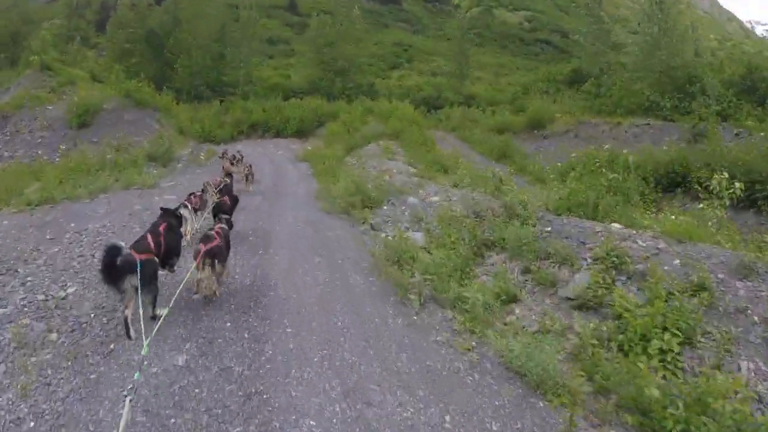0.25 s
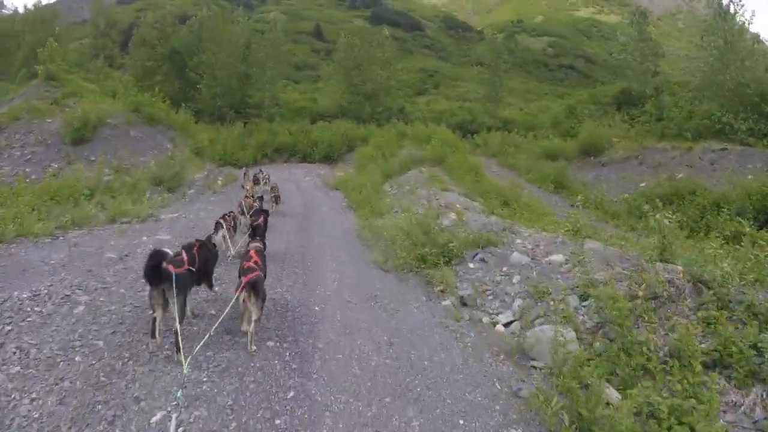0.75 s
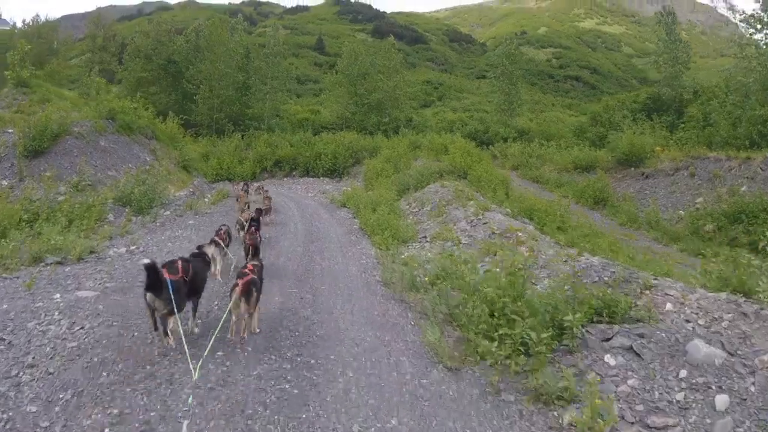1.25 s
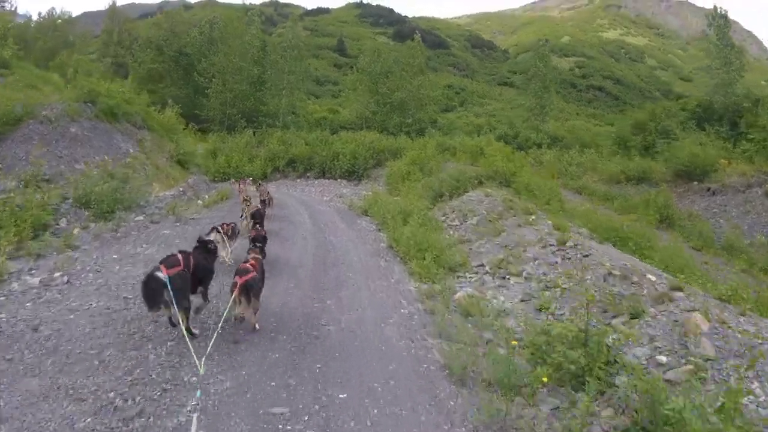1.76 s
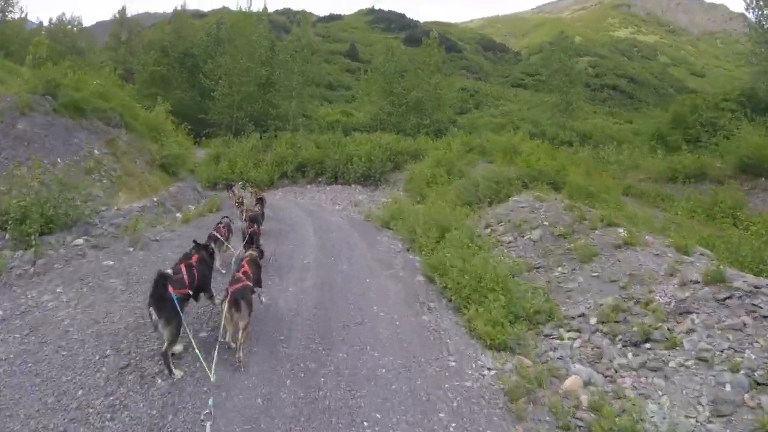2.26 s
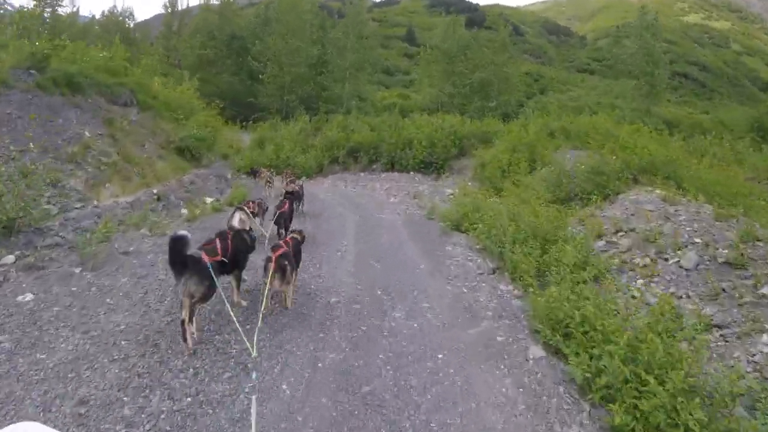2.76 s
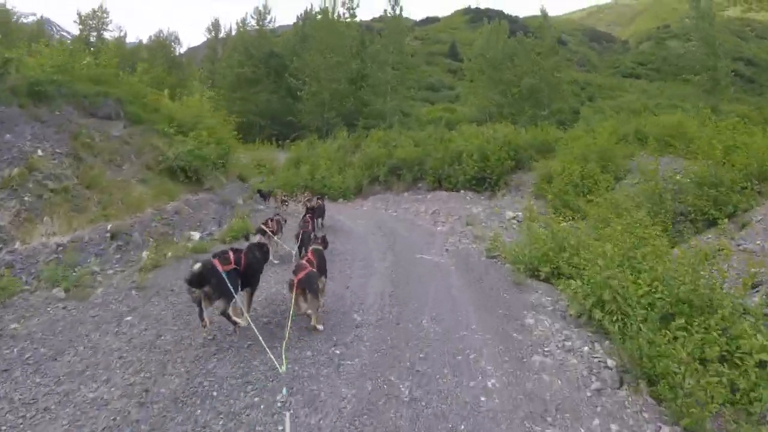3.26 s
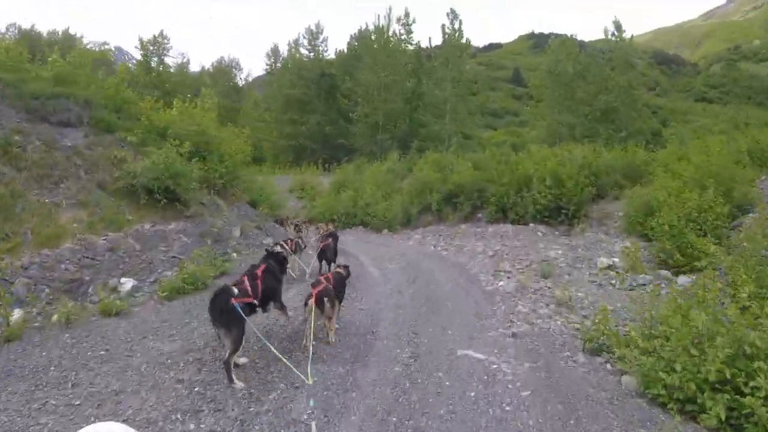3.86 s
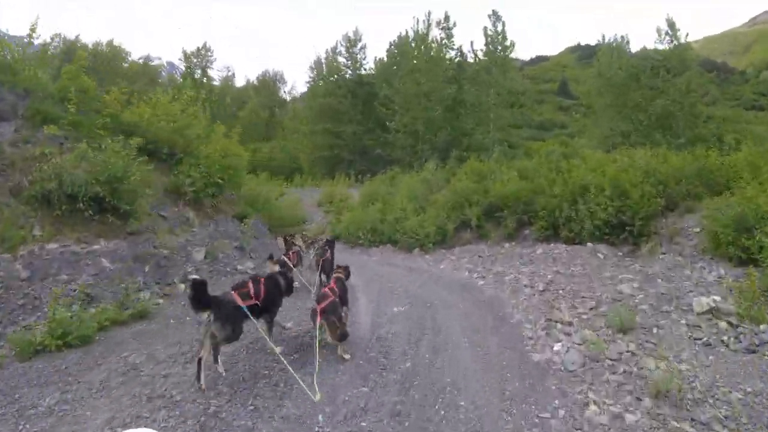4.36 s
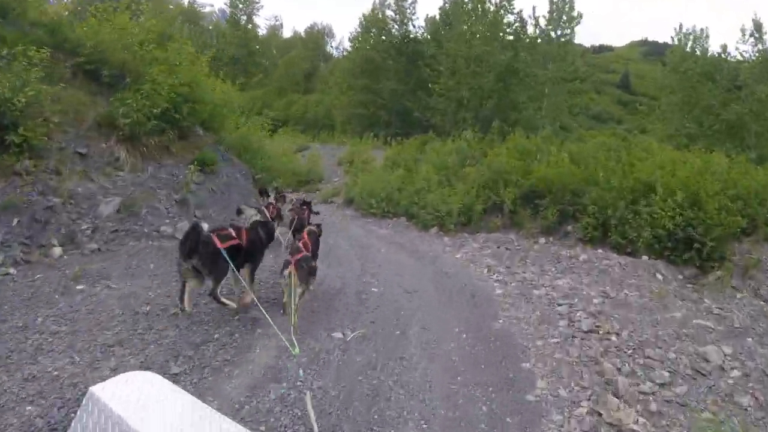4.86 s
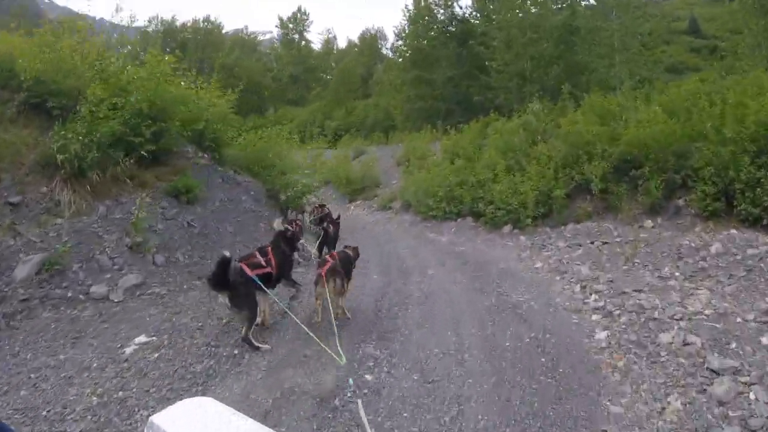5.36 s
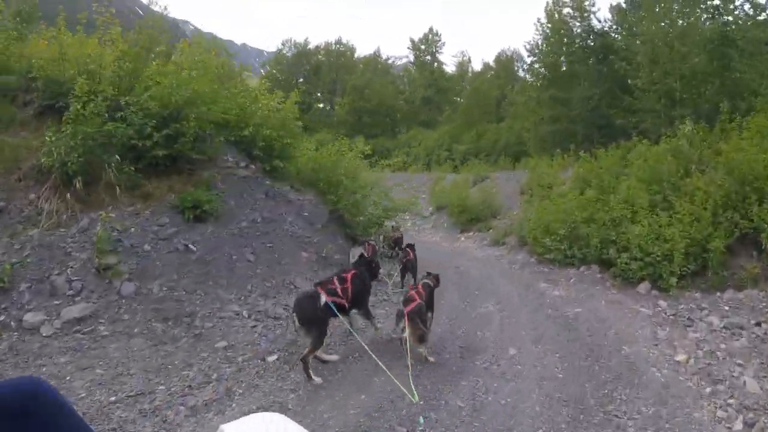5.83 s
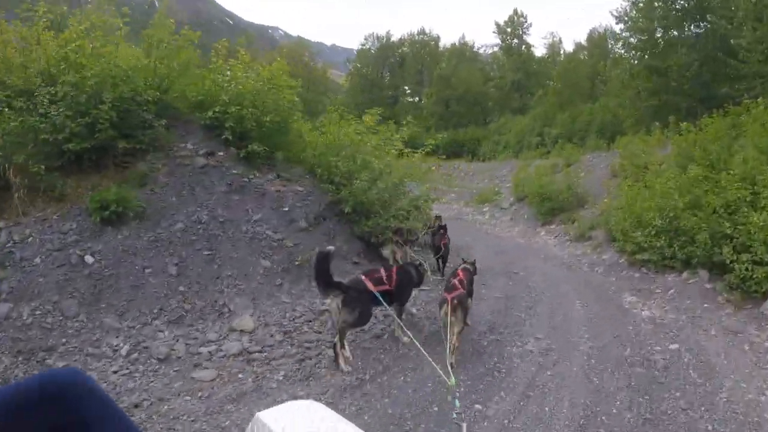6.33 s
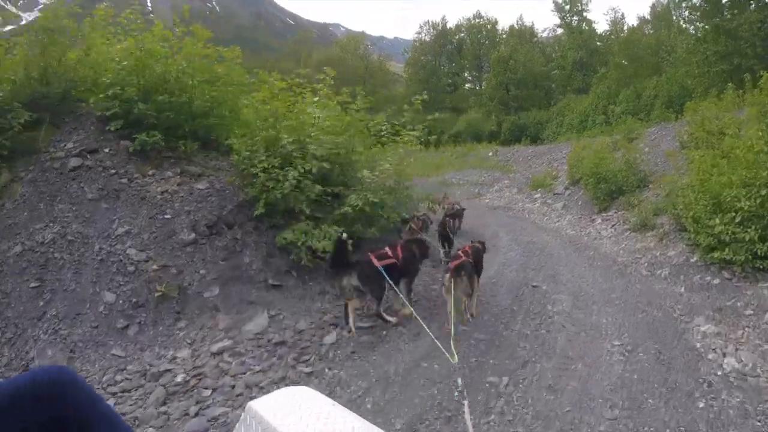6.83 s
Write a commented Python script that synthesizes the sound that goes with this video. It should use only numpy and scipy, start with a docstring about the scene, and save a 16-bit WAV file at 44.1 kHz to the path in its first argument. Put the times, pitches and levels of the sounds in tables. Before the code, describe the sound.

A wheeled cart rolls steadily over loose gravel, deep uneven rumble underneath, stones crunching and thudding under the tyres, one sharp metallic clack near the end.

```python
"""On a gravel track, a cart pulled by a dog team rolls along, heard by a small microphone on board.
Bumps drive resonances of the frame into a low rumble; slipping stones crunch as noise bursts under
the tyres, and larger ones thud. Lumps ring the tyre air, grit ticks and taps the metal floor pan,
a thrown stone clacks on the pan modes and a harness snap clinks; the recorder's limiter evens out
the rumble and its input rounds the peaks."""
import sys
import numpy as np
from scipy import signal
from scipy.fft import rfft, irfft
from scipy.io import wavfile
from scipy.ndimage import uniform_filter1d

SR = 44100
rng = np.random.default_rng(int(sys.argv[2]) if len(sys.argv) > 2 else 0)


def dump(signal):
    """Clip the signal to [-1, 1] and save it as 16-bit WAV at the path in sys.argv[1]."""
    limited = np.clip(np.atleast_2d(signal).T, -1, 1)
    pcm = np.round(limited * 32767).astype(np.int16)
    wavfile.write(sys.argv[1], SR, pcm)


N = 312669

# large stones giving way under the tyres: [t/s, burst level/dB, thud over burst/dB]
STONE_BLOWS = [(0.019, -34, 10), (0.174, -34.5, 8), (0.2019, -33.5, 7), (0.2747, -38, 9.5),
               (0.3131, -36.5, 4), (0.388, -48, 6), (0.4497, -37, 4), (0.541, -39, -6), (0.633, -34.5, 9),
               (0.773, -39, 9.5), (0.8388, -36, 10.5), (0.884, -33, 8), (1.1262, -35.5, 6.5),
               (1.518, -30.5, 4), (1.5735, -30.5, 6.5), (1.653, -31.5, 9), (1.7023, -30, -2),
               (1.726, -30.5, 10), (1.9583, -34, 6.5), (2.3083, -38, -3), (2.368, -29.5, 6.5),
               (2.422, -28.5, 9.5), (2.438, -35, 7), (2.4559, -36.5, 9), (2.482, -33.5, 3.5),
               (2.4977, -46, 1), (2.72, -34.5, 4), (2.9015, -36, -4), (3.028, -44, 16.5), (3.147, -39, 7),
               (3.3944, -37, 4), (3.4863, -36.5, 11), (3.6657, -39, -6), (3.8213, -29, 3),
               (3.8937, -33, 6.5), (3.94, -35, 7.5), (4.142, -33, 6), (4.2191, -31, 7.5), (4.375, -41, -13),
               (4.5262, -38, -16), (4.706, -51, 15), (4.873, -30.5, 2), (4.915, -34, -29), (4.948, -34, 14),
               (5.005, -31.5, 6), (5.275, -38, 6), (5.3728, -34, 1), (5.4025, -32, 1), (5.6369, -27.5, 5),
               (6.176, -36.5, -15), (6.327, -32, 1.5), (6.4823, -26, 6), (6.5, -45, 13.5), (6.542, -38, 3),
               (6.783, -46, 14), (6.97, -34, 8.5)]
# modes of the metal floor pan: [f/Hz, relative level/dB, time to fall 60 dB t/s]
PAN_MODES = [(2170, -7, 0.14), (2490, -12, .12), (2890, -2.5, 0.15), (3400, -10, 0.11), (4000, -17, 0.13),
             (4400, -12.5, .1), (4570, -16, .13), (4690, 1, 0.058), (4900, -6, 0.14), (5330, -16, .1),
             (5600, -3, 0.072), (6240, 2, 0.067), (7100, -6, .06), (10300, -15, .045)]


def frame():
    """Forced resonance: random bumps drive the low modes of frame and tyres; a limiter evens them out."""
    # resonances: [f/Hz, width of the narrower filter/Hz, relative level/dB]
    resonances = [(38, 20, -9), (68.3, 29, -8.5), (101.2, 30, -1.5), (127.8, 33, 0.5), (157.6, 34, -2.5),
                  (200.6, 31, -8.5), (244.6, 20.4, -13.5)]
    # gain of the resonances below 80 Hz: [t/s, level/dB]
    deep_gain = [(0, -5), (.8, -0.5), (1.6, 0), (2.5, 1), (3.1, -3.5), (3.7, -4.5), (4.3, 0), (4.8, 5),
                 (5.3, -1), (6.2, 3.5), (7.09, 4)]
    deep_db = np.interp(np.arange(N) / SR, *np.transpose(deep_gain))
    rumble = 0
    for hz, width, db in resonances:
        bumps = rng.standard_normal(N)
        mode = unit(band(band(bumps, hz, width), hz, 2 * width))
        # each resonance swells on its own
        mode_db = db + (hz < 80) * deep_db + 1.6 * walk(rate=18)
        rumble = rumble + undb(mode_db) * mode
    rumble = unit(rumble)
    # the recorder's limiter evens out the rumble: loud swells are turned down, weak ones lifted
    limiter_share, limiter_s = 0.42, 0.045
    k = int(limiter_s * SR)
    swell_power = uniform_filter1d(uniform_filter1d(rumble ** 2, k), k) + 0.053
    return unit(rumble / swell_power ** (limiter_share / 2))


def jolts():
    """Impulsive excitation: each large knock lifts the rumble gain, which decays exponentially."""
    gain_over_knock_db, t60_s = 30.5, 0.27
    s, db, _ = np.transpose(STONE_BLOWS)
    decay = undb(-60 / (t60_s * SR))
    shake = signal.lfilter([1], [1, -decay], spikes(s, db + gain_over_knock_db))
    return np.sqrt(1 + uniform_filter1d(shake, 300) ** 2)


def gravel(coarse_db, grit_db):
    """Granular noise: coarse slips crunch over a roll that rings the tyre air; fine grit crackles."""
    # colour of crushed coarse stones: [f/Hz, relative level/dB]
    coarse_colour = [(160, -27), (280, -1.5), (323, -4), (481, -6), (543, -3), (595, -6.5), (1140, -12.5),
                     (1860, -22.5), (2330, -23.5), (3200, -36), (4160, -60), (7040, -120)]
    # colour of crushed fine grit: [f/Hz, relative level/dB]
    grit_colour = [(1650, -34.5), (2800, -1.5), (4080, -4.5), (6300, -1.5), (6950, -8), (10600, -7.5),
                   (11900, -38), (13500, -18.5), (14900, -35)]
    tyre_hz, tyre_width_hz, tyre_db = 552, 108, -14
    surge = walk(rate=21.94)

    stones = crunch(per_s=320, spread_db=3.5, tail_s=0.013, bed=0.49)
    roll = rng.standard_normal(N)
    # slips are heard in the upper part; the tyre smooths the lower part
    edge = signal.lfilter(*signal.butter(2, 450, "high", fs=SR), stones - roll)
    tyre_air = undb(tyre_db) * unit(band(roll, tyre_hz, tyre_width_hz))
    coarse = colour(roll + edge, coarse_colour) + tyre_air

    # grains of three sizes crackle on their own; the large slips throw all of them
    grit = 0
    for hz, width in [(3300, 1600), (5800, 6200), (10000, 6600)]:
        grains = crunch(per_s=410, spread_db=3.0, tail_s=0.0012, bed=0.51) + 0.2 * stones
        grit = grit + undb(1.6 * walk(rate=35)) * band(grains, hz, width)
    grit = grit * spills(per_s=37, tail_s=0.01, depth=6.9)
    grit = unit(colour(grit, grit_colour))

    # even hiss of the gravel further off
    far = undb(-55) * unit(band(rng.standard_normal(N), 5000, 5800))
    return undb(coarse_db + 1.8 * surge) * coarse + undb(grit_db + 0.5 * surge) * grit + far


def crunch(per_s, spread_db, tail_s, bed):
    """Shot noise: few large and many small stones slip at random, each a short burst over a bed."""
    when, size = rng.random((int(per_s * N / SR), 2)).T
    # spikes are powers here; their levels spread exponentially up to 4.5 spreads
    slips = spikes(when * (N - 1) / SR, -2 * spread_db * np.log(1 - size).clip(-4.5, 0))
    power = signal.lfilter([1], [1, -np.exp(-1 / (tail_s * SR))], slips)
    return unit(np.sqrt(power / power.mean() + bed) * rng.standard_normal(N))


def spills(per_s, tail_s, depth):
    """Relaxation: the gain jumps whenever a handful of grit breaks loose, then settles."""
    when, size = rng.random((int(per_s * N / SR), 2)).T
    breaks = spikes(when * (N - 1) / SR, -12 * size)
    jumps = signal.lfilter([1], [1, -np.exp(-1 / (tail_s * SR))], breaks)
    return np.sqrt(1 + depth * uniform_filter1d(jumps, 40))


def knocks():
    """Impact and friction: a stone gives way in a grinding burst and thuds on the body resonances."""
    # sharp part of a burst: [f/Hz, relative level/dB]
    burst_colour = [(1200, -7.5), (1800, -6), (2350, -4.5), (3000, -8.5), (4000, -10), (6300, -10.5),
                    (7200, -14.5), (10500, -26.5), (14900, -46)]
    # cart body under a blow: [f/Hz, width of the narrower filter/Hz, relative level/dB]
    body = [(523, 130, 0), (869, 205, 2), (1123, 95, -1.5), (1594, 150, -8), (2008, 170, -9.5),
            (2340, 220, -10.5)]
    hold_s, t60_s, rise_s = 0.0094, 0.22, 0.0025
    blow_db, blow_t60_s = 2.5, 0.019  # harder first contact
    pitch_share, spread_db = 0.06, 3  # every stone strikes the body elsewhere
    out, t = np.zeros(N + SR), np.arange(SR // 3) / SR
    grind = undb(-60 * np.maximum(t - hold_s, 0) / t60_s)
    fade = (grind + undb(blow_db - 60 * t / blow_t60_s)) * np.minimum(t / rise_s, 1)
    small = [(s, -39 + 1.5 * a, 1 + 5 * b) for s, a, b in strays(per_s=1)]
    for s, db, thud_db in small + STONE_BLOWS:
        noise = rng.standard_normal((3, len(t)))
        grain = undb(1.24 * unit(uniform_filter1d(noise[2], 90)))

        burst = colour(noise[0], burst_colour)
        low = signal.lfilter(*signal.butter(2, 3100, fs=SR), burst)
        # the heavier the thud, the darker the burst
        bright_db = -2.5 - 0.13 * thud_db
        burst = grain * (low + undb(bright_db) * (burst - low))

        thud = 0
        for hz, width, mode_db in body:
            a, b = rng.uniform(-1.24, 1, 2)
            struck_hz = hz * (1 + pitch_share * a)
            mode = unit(band(band(noise[1], struck_hz, width), struck_hz, 2 * width))
            thud = thud + undb(mode_db + spread_db * b) * mode
        thud = undb(thud_db) * grain * unit(thud)

        i = int(s * SR)
        out[i:i + len(t)] += undb(db) * fade * (burst + thud)
    return out[:N]


def thumps():
    """Damped oscillation: a lump and its scrape ring a dull tyre mode that sags in pitch."""
    # lumps under the tyres: [t/s, level/dB, starting f/Hz]
    lumps = [(.196, -15, 950), (0.388, -12.5, 565), (1.721, -15, 460), (1.819, -14.5, 500),
             (2.296, -21, 690), (2.371, -20, 518), (4.318, -20, 530), (4.481, -13.5, 600),
             (4.632, -33, 525), (4.779, -18, 620), (4.8755, -14, 1670), (4.883, -14, 576),
             (4.998, -12, 430), (5.588, -14, 574), (6.078, -18.5, 560), (6.472, -22, 660),
             (6.486, -21, 940), (6.903, -15, 620), (6.971, -14, 815)]
    sag_per_s, rise_s = 7.4, 0.0024  # the pitch sags as the tyre spreads
    cycles_to_60_db, scrape_db = 34, -4
    out, t = np.zeros(N + SR), np.arange(SR // 8) / SR
    small = [(s, -24 + 3 * a, 720 * (1 + 0.345 * b)) for s, a, b in strays(per_s=7)]
    for s, db, hz in small + lumps:
        scrape = unit(band(band(rng.standard_normal(len(t)), hz, 400), hz, 640))
        tone = np.sin(2 * np.pi * hz * t * (1 - sag_per_s * t / 2))
        fade = undb(db - 60 * t * hz / cycles_to_60_db) * np.minimum(t / rise_s, 1)
        i = int(s * SR)
        out[i:i + len(t)] += (tone + undb(scrape_db) * scrape) * fade
    return out[:N]


def ticks():
    """Transient narrow-band noise: a grain of grit snaps in a short click around its own pitch."""
    # single grains: [t/s, level/dB, f/Hz]
    grains = [(0.625, -26, 4910), (0.776, -30, 5000), (0.816, -39, 6200), (0.91, -37, 5940),
              (1.286, -32, 6500), (1.6, -35, 6380), (1.9714, -33, 6600), (2.622, -29, 6415),
              (2.768, -30, 3800), (3.265, -28, 5080), (3.613, -26, 6545), (4.062, -40, 8640),
              (4.1265, -30, 5360), (4.391, -25, 6130), (4.5286, -28, 4900), (4.668, -29, 6130),
              (5.005, -23, 6430), (5.149, -38, 7000), (5.258, -44, 6940), (5.274, -35, 5500),
              (5.2964, -26, 5900), (5.455, -22, 5700), (5.502, -29, 8000), (5.543, -35, 5500),
              (5.6096, -40, 6140), (5.6641, -19.5, 5200), (5.734, -26, 5600), (5.7695, -29, 5680),
              (5.861, -25, 5500), (5.902, -22, 4240), (6.0916, -24.5, 6100), (6.4294, -31, 5000),
              (6.457, -31, 5800), (6.579, -24, 5600), (6.666, -26, 6100), (6.847, -36, 8500)]
    t60_s, rise_s = 0.013, 0.00062
    out, t = np.zeros(N + SR), np.arange(SR // 50) / SR
    small = [(s, -34.5 + 3.5 * a, 5200 * (1 + 0.25 * b)) for s, a, b in strays(per_s=9)]
    for s, db, hz in small + grains:
        noise = rng.standard_normal(len(t))
        click = unit(band(band(noise, hz, 0.5 * hz), hz, 0.94 * hz))
        fade = undb(db - 60 * t / t60_s) * np.minimum(t / rise_s, 1)
        i = int(s * SR)
        out[i:i + len(t)] += click * fade
    return out[:N]


def clack():
    """Plate vibration: a thrown stone rings wavering pan modes over a hiss whose treble dies first."""
    # stone thrown against the floor pan: [t/s, level/dB]
    hits = [(6.326, -5.5)]
    # colour of the dense upper modes of the pan: [f/Hz, relative level/dB]
    dense_modes = [(530, -33), (900, -15), (1140, -10), (1310, -13), (2250, -7), (2910, -9), (3640, -5.5),
                   (5680, -4), (7710, -3), (10600, 4), (14900, -41)]
    out, t = np.zeros(N + SR), np.arange(SR // 3) / SR
    for s, db in hits:
        modes = 0
        for hz, mode_db, t60 in PAN_MODES:
            # the loose sheet makes each mode flutter
            flutter_db = 4.0 * unit(uniform_filter1d(rng.standard_normal(len(t)), 160))
            fade = undb(mode_db - 14.0 - 60 * t / t60 + flutter_db)
            modes = modes + fade * np.sin(2 * np.pi * hz * t)

        hiss = colour(rng.standard_normal(len(t)), dense_modes)
        low = signal.filtfilt(*signal.butter(3, 6900, fs=SR), hiss)
        # each part holds, falls and leaves a weaker tail
        slow = undb(-60 * np.maximum(t - 0.022, 0) / 0.08) + undb(-14 - 60 * t / 0.14)
        quick = undb(-60 * np.maximum(t - 0.006, 0) / 0.027) + undb(-25 - 60 * t / 0.16)
        wash = undb(-10.0) * (slow * low + quick * (hiss - low))
        crack = undb(-5 - 60 * t / 0.0074) * hiss
        i = int(s * SR)
        out[i:i + len(t)] += undb(db) * (modes + wash + crack)
    return out[:N]


def pings(grit_db):
    """Modal excitation: flying grit taps the floor pan, each tap ringing one of its modes faintly."""
    out = 0
    for hz, db, t60 in PAN_MODES:
        when, size = rng.random((60, 2)).T
        taps = spikes(when * (N - 1) / SR, -9 * size)
        # halved dB levels even out the modes
        out = out + undb(0.5 * db) * ring(taps, hz, 0.83 * t60)
    return undb(grit_db) * out


def clinks():
    """Free vibration: blows on the small steel harness snap ring its two high modes."""
    # blows: [t/s, level before filtering/dB]
    snap_blows = [(6.5525, -37), (6.5794, -38), (6.651, -47)]
    # modes of the snap: [f/Hz, gain/dB, time to fall 60 dB t/s]
    snap_modes = [(9750, 12, 0.022), (14300, -11, .025)]
    blows = band(spikes(*np.transpose(snap_blows)), 11000, 6000)
    return sum(undb(db) * ring(blows, hz, t60) for hz, db, t60 in snap_modes)


def undb(db):
    """Level law: amplitude ratio of a level in dB."""
    return 10 ** (np.asarray(db) / 20)


def unit(x):
    """Normalisation by energy: scale to rms 1."""
    return x / np.sqrt(np.mean(x ** 2))


def colour(x, table):
    """Minimum-phase filtering: a causal cepstral response to a (Hz, dB) outline, gain 1 on white noise."""
    hz, db = np.transpose(table)
    size = 2 ** 11
    grid_hz = np.arange(size + 1) * SR / 2 / size
    outline_db = np.interp(np.log(grid_hz + 1), np.log(hz), db)
    cepstrum = irfft(np.log(undb(outline_db)))
    # fold the negative times onto the positive ones
    cepstrum[1:size] *= 2
    cepstrum[size + 1:] = 0
    response = irfft(np.exp(rfft(cepstrum)))[:size]
    return signal.fftconvolve(x, response / np.linalg.norm(response))[:len(x)]


def ring(x, hz, t60):
    """Damped mode: a unit impulse rings as a decaying sine, its envelope starting at 1."""
    pole = np.exp(2j * np.pi * hz / SR - np.log(1000) / (t60 * SR))
    return signal.lfilter([1], [1, -pole], x).imag


def band(x, hz, width):
    """Second-order resonance with gain 1 at its centre."""
    return signal.lfilter(*signal.iirpeak(hz, hz / width, fs=SR), x)


def walk(rate):
    """Slow random modulation: levels held 1 / rate s and slewed twice, rms 1."""
    k = int(SR / rate)
    held = np.repeat(rng.standard_normal(N // k + 1), k)
    return unit(uniform_filter1d(uniform_filter1d(held, k), k)[:N])


def spikes(s, db):
    """Impulse train: one-sample blows at times s with levels db."""
    x = np.zeros(N)
    np.add.at(x, (np.asarray(s) * SR).astype(int), undb(db))
    return x


def strays(per_s):
    """Random point process: rows of a random time, then two draws between -1 and 1."""
    when, a, b = rng.random((int(per_s * N / SR), 3)).T
    return np.column_stack([when * (N - 1) / SR, 2 * a - 1, 2 * b - 1])


def humps(rows):
    """Smooth level modulation: sum of raised-cosine humps from (centre s, length s, dB) rows."""
    t = np.arange(N) / SR
    return sum(db * np.cos(np.pi * np.clip((t - s) / length, -.5, .5)) ** 2 for s, length, db in rows)


def scene():
    """Superposition: all sources add at one microphone; loose patches lift rumble, stones and grit."""
    # slow state of the track: [t/s, rumble level/dB, coarse stone level/dB, fine grit level/dB]
    track = [(0, -10.5, -26.5, -43.5), (.5, -11, -29, -50.5), (1.0, -13, -29, -45),
             (1.35, -12, -28.5, -44.5), (1.9, -11, -28, -48.5), (2.3, -12, -28, -44.5),
             (2.7, -14, -29.5, -48), (3.3, -10.5, -27, -43), (3.7, -11.5, -29, -46), (4.1, -11, -29.5, -47),
             (4.65, -14.5, -29, -45.5), (5.2, -12.5, -29.5, -42), (5.6, -13, -28.5, -42),
             (5.9, -12.5, -29, -44.5), (6.3, -13, -29.5, -44.5), (6.65, -13, -28.5, -39),
             (6.85, -13, -28, -45), (7.09, -11, -26.5, -40)]
    # looser (+) or packed (-) gravel under the wheels: [centre t/s, length t/s, level/dB]
    patches = [(0.0, 0.035, 10), (.65, 0.42, 2.5), (.86, 0.13, 6), (1.13, 0.33, 2), (1.6, 0.38, 4),
               (2.29, 0.12, -5), (2.43, 0.26, 4), (3.6, .08, 4), (3.79, 0.2, 5), (4.54, 0.11, 1.5),
               (4.92, 0.28, 4), (5.46, 0.41, 0.5), (6.77, 0.14, 2.5)]
    # short dips of the rumble: [centre t/s, level/dB]
    dips = [(.41, -5.5), (.55, -7), (3.105, -9), (3.63, -9), (3.711, -8), (4.56, -5), (5.51, -8), (5.9, -5),
            (6.4, -4.5)]
    rumble_share, grit_share, dip_s = 0.46, 0.99, 0.059  # shares: how far each follows a patch
    s, *columns = np.transpose(track)
    rumble_db, coarse_db, grit_db = (np.interp(np.arange(N) / SR, s, c) for c in columns)
    patch_db = humps(patches)
    dip_db = humps([(at, dip_s, db) for at, db in dips])
    rumble_db = rumble_db + rumble_share * patch_db + dip_db
    grit_db = grit_db + grit_share * patch_db

    rumble = undb(rumble_db) * jolts() * frame()
    stones = gravel(coarse_db + patch_db, grit_db) + knocks() + thumps() + ticks()
    metal = pings(grit_db) + clack() + clinks()
    return (rumble + stones + metal)[None]


def record(dry):
    """Low-pass and saturation: the housing dulls the top, the recorder rounds peaks and cuts the top."""
    housing_hz, top_hz, drive = 11620, 15030, 0.89
    housing = signal.butter(6, housing_hz, fs=SR, output="sos")
    dull = 0.26 * dry + 0.67 * signal.sosfilt(housing, dry)
    rounded = np.tanh(drive * dull) / drive
    # 0.2 dB ripple, 70 dB stop band
    return signal.sosfilt(signal.ellip(8, .2, 70, top_hz, fs=SR, output="sos"), rounded)


dry = scene()
out = record(dry)
dump(out)
```